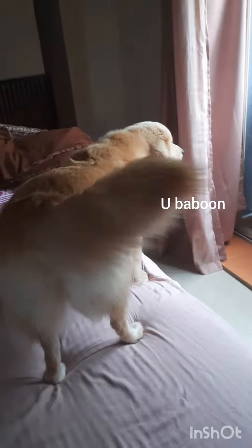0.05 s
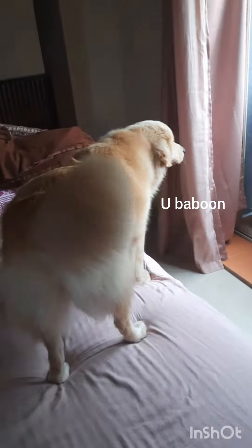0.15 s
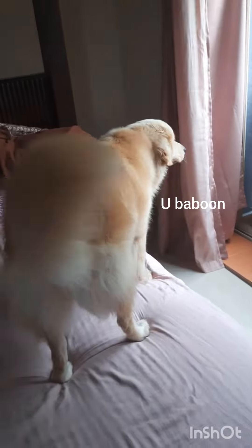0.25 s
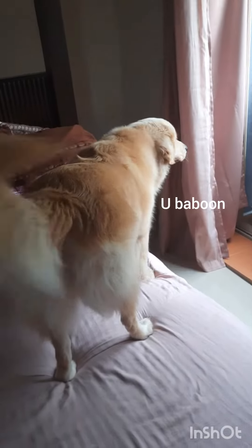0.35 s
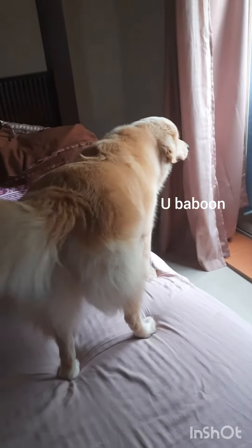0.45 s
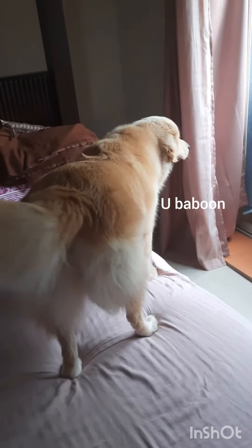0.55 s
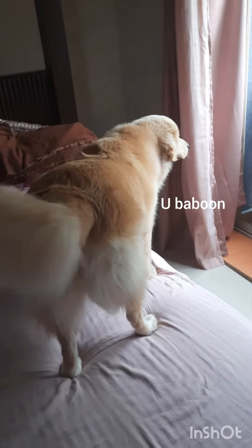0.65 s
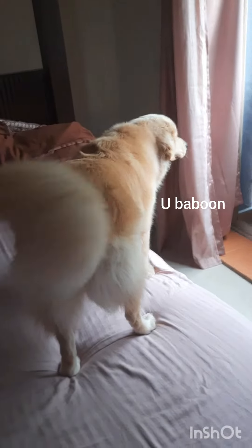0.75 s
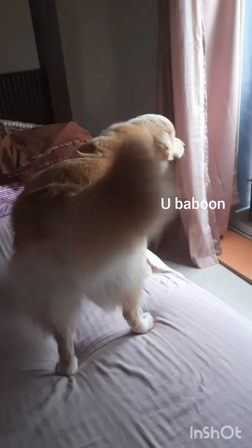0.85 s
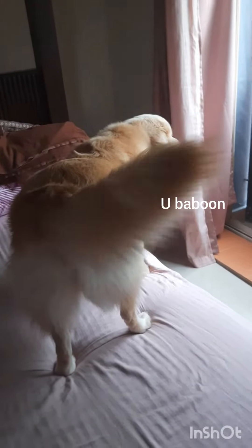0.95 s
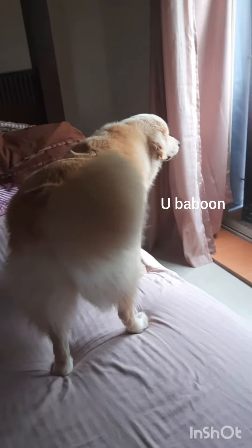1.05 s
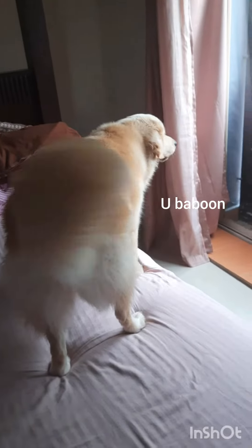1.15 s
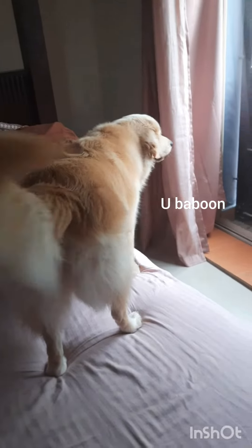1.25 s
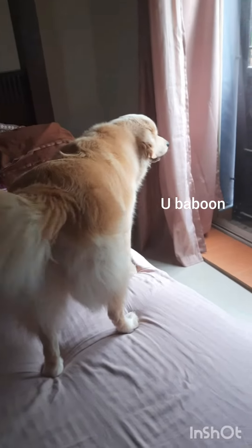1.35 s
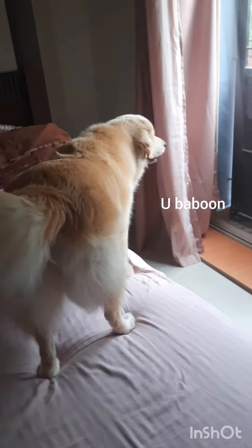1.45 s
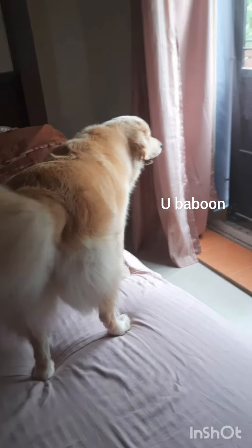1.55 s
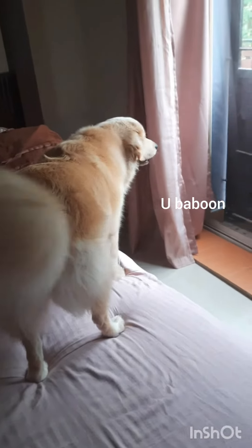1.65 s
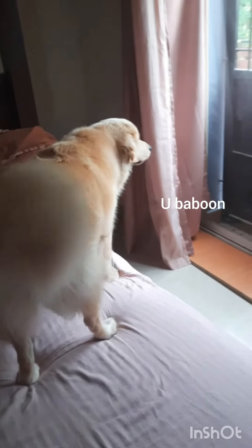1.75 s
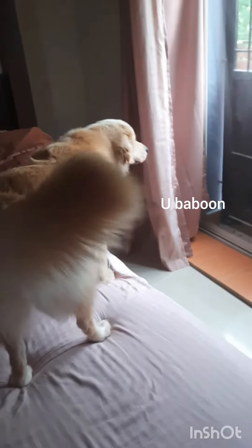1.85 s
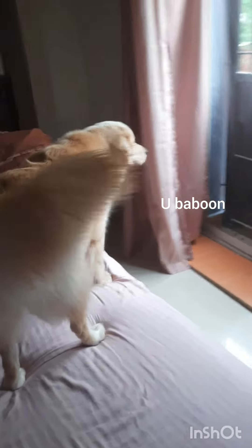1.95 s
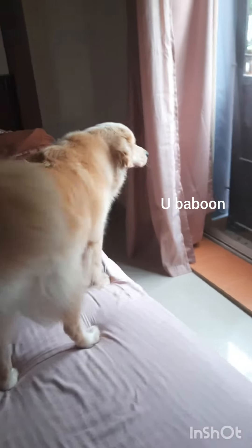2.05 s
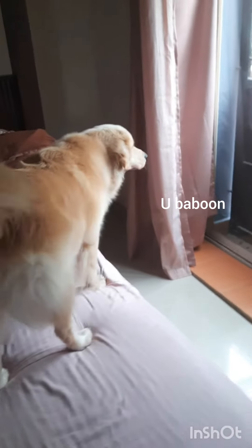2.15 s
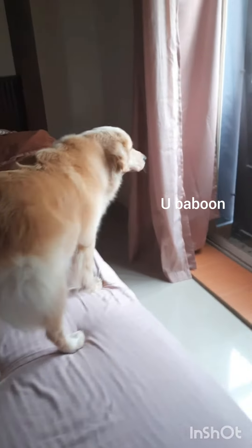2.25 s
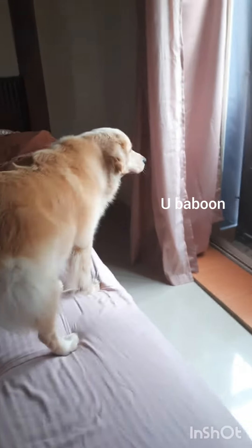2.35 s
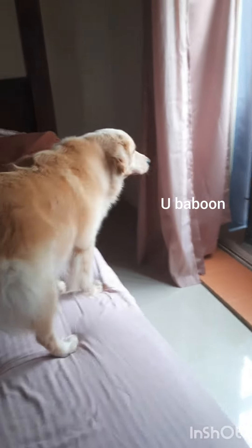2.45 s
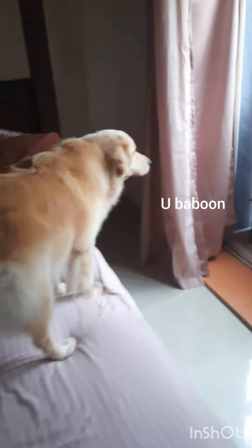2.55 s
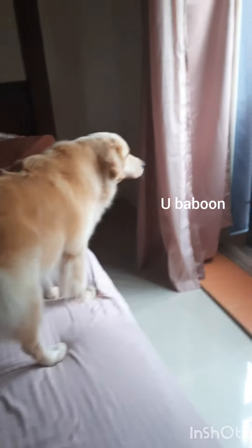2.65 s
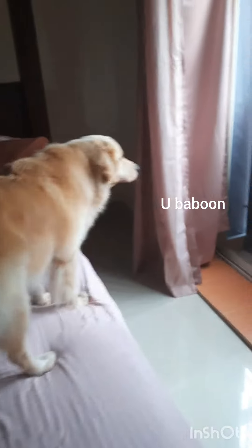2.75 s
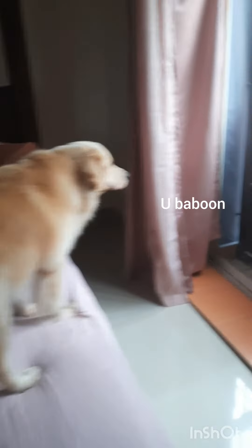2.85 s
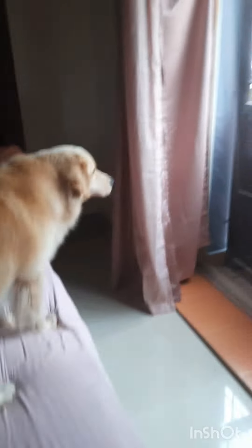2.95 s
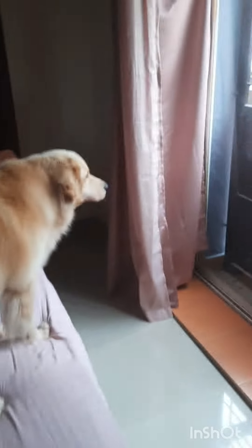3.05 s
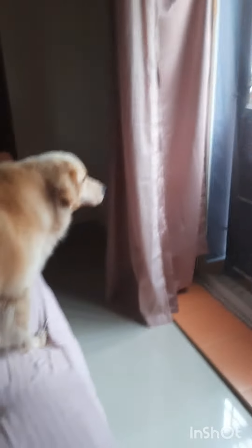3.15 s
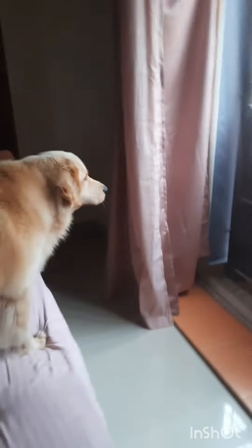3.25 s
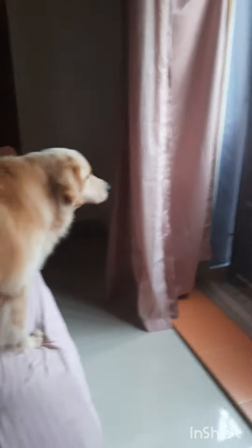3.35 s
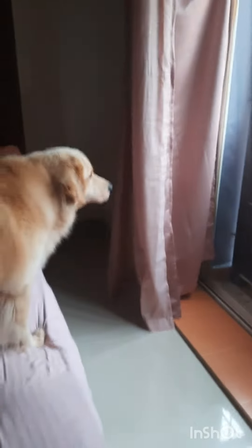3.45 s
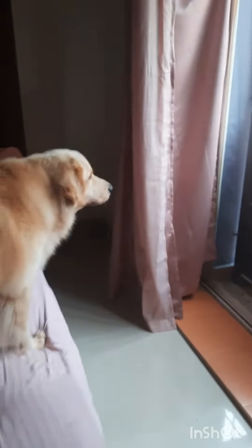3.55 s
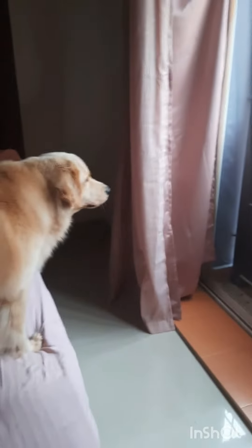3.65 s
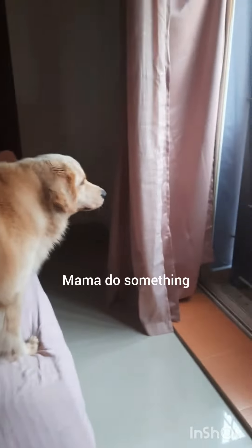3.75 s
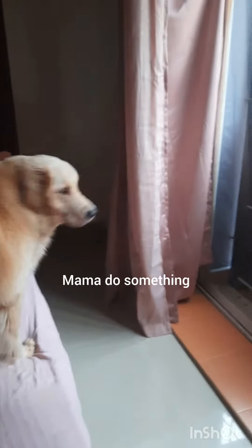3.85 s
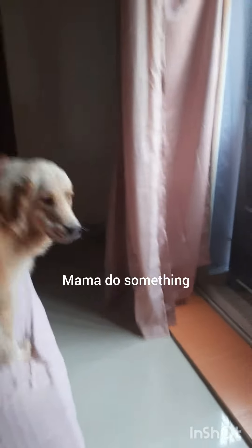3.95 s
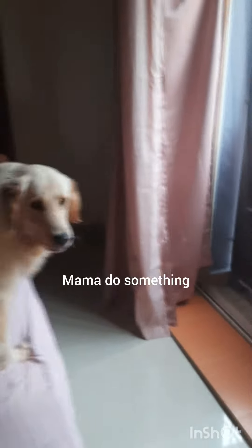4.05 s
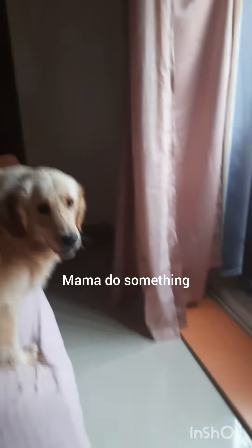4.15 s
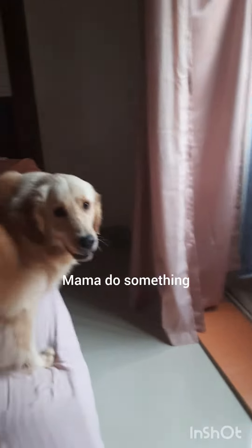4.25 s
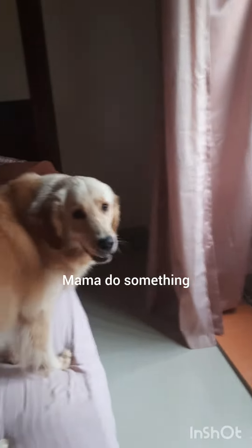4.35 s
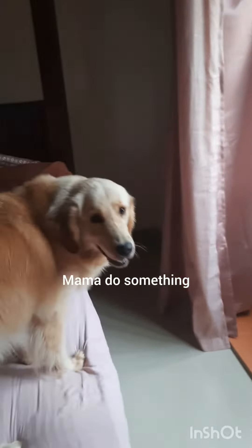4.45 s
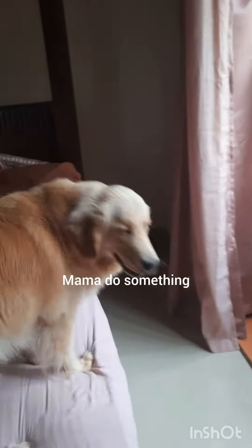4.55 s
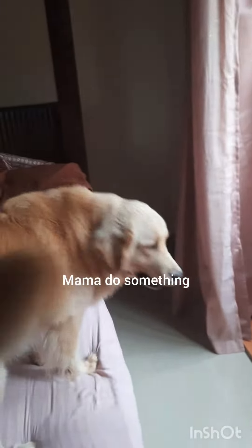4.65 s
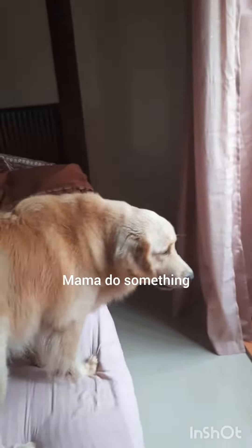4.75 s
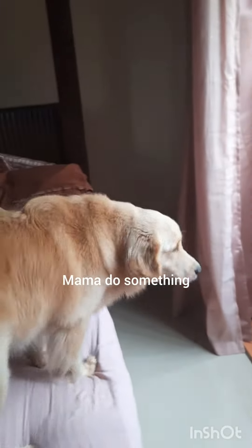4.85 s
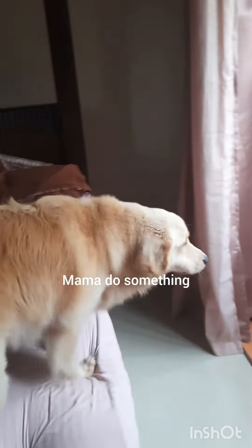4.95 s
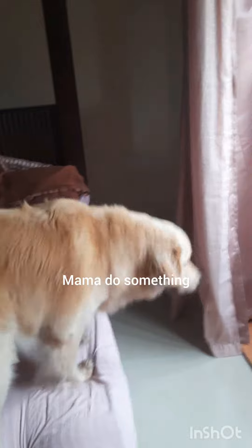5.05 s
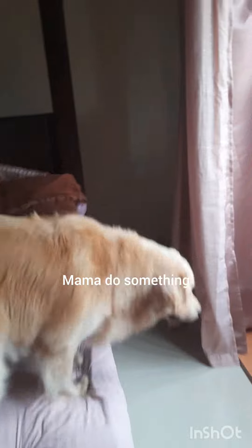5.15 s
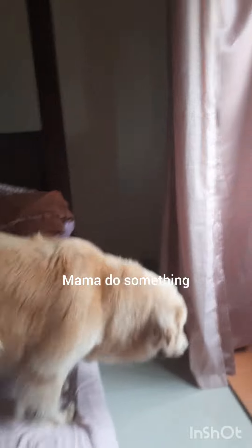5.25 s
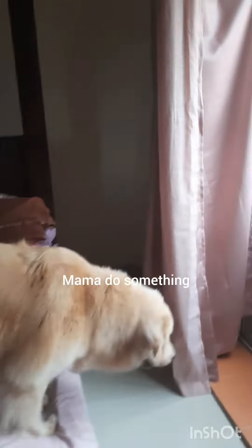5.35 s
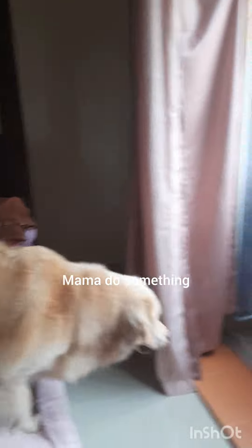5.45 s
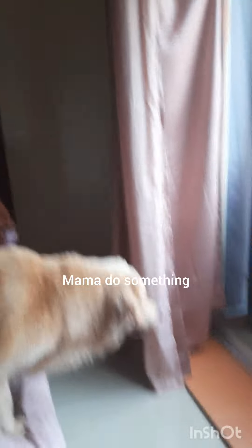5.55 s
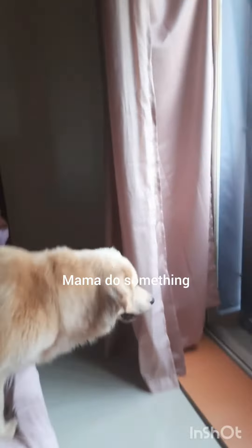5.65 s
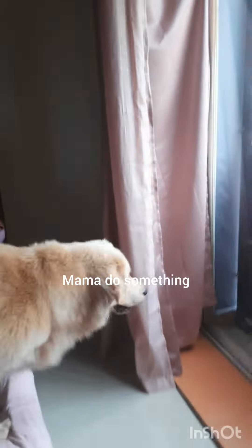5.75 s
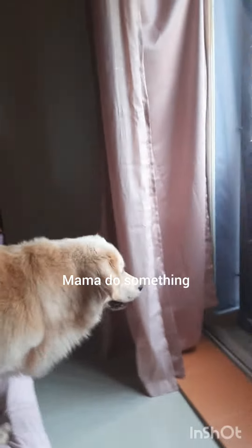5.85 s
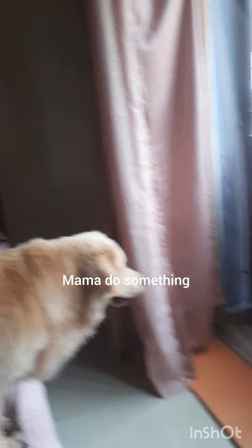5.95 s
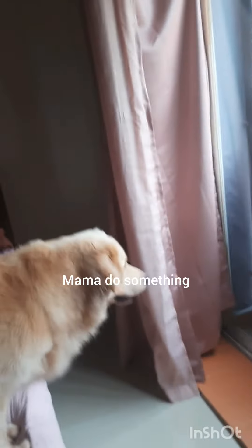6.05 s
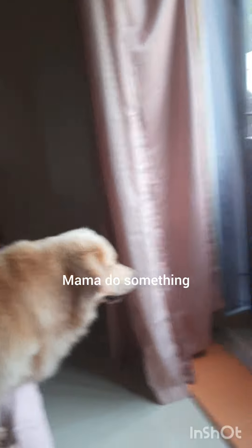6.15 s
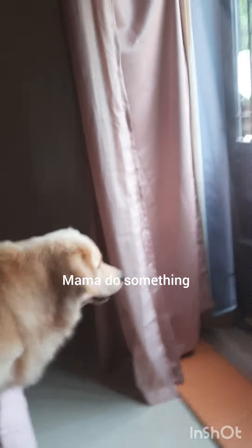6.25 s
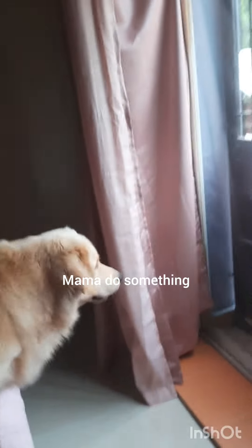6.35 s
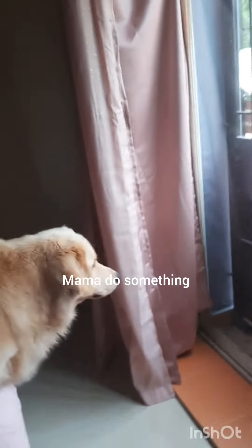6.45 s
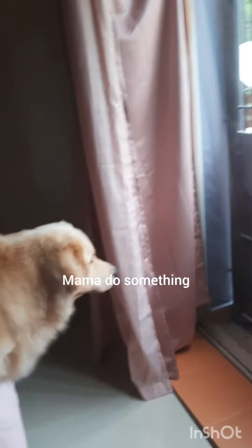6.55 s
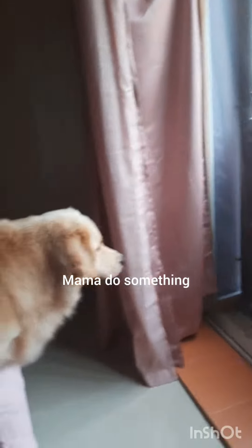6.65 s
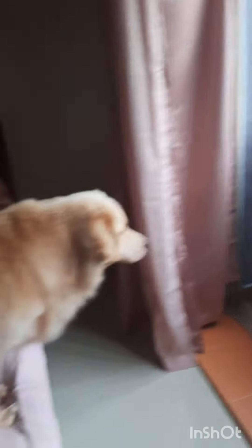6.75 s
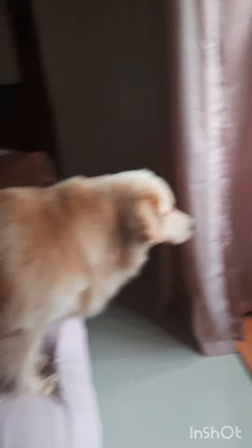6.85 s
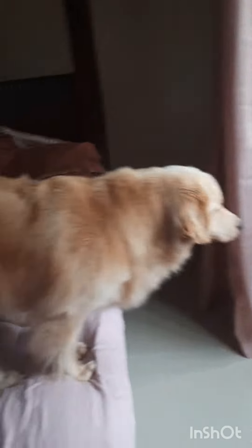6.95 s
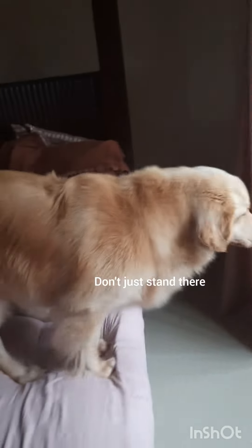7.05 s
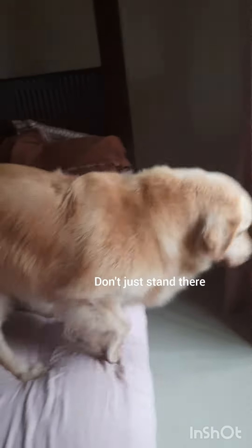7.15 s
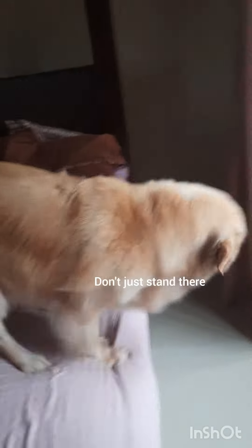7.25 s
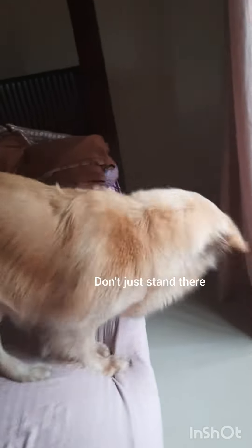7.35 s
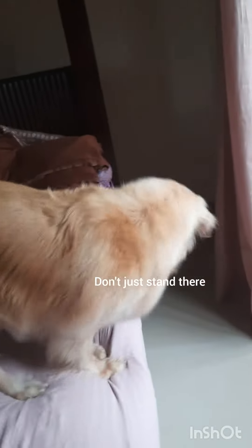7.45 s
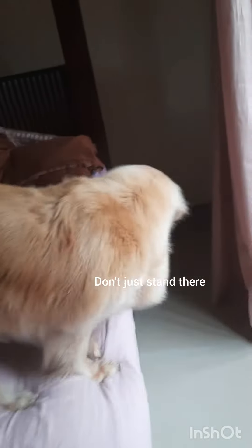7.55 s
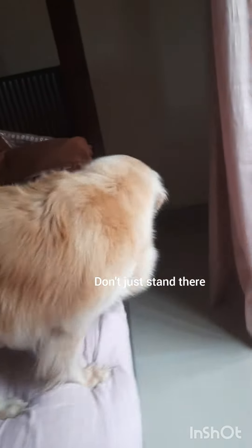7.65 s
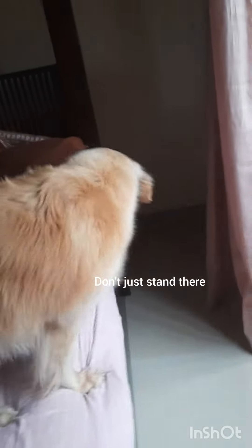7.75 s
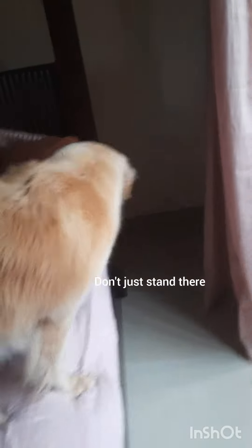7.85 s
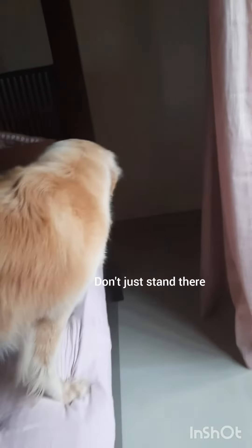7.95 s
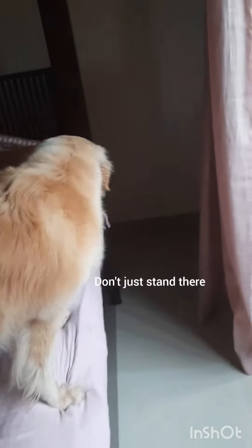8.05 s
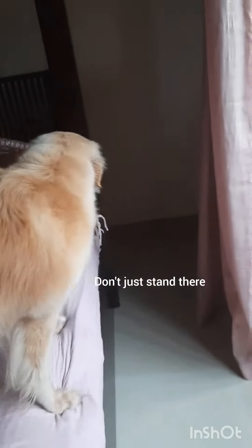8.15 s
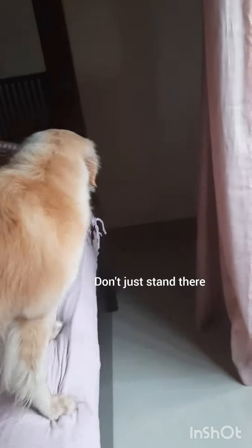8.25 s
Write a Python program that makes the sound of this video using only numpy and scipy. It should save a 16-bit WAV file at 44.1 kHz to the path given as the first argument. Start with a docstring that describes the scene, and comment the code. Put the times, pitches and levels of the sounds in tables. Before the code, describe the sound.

Throaty dog growls over soft room rumble, broken by a sudden loud bark, a muffled woof and a final growled bark, echoing briefly.

```python
"""A large dog on a bed in a tiled bedroom growls low with a fluttering throat, over a low hum, rumble and faint
hiss. It pants and sniffs, whines faintly, smacks its lips and paws the mattress; it barks twice and woofs once.
The voice is fold pulses, sine partials and noise through resonances; breath, rumble, murmur and hiss are shaped
noise, with a steady low sine hum beside the rumble. The walls answer the dog for about half a second."""
import sys
import numpy as np
from scipy import signal
from scipy.fft import rfft, irfft, next_fast_len
from scipy.io import wavfile
from scipy.ndimage import uniform_filter1d, minimum_filter1d, map_coordinates

SR = 44100
rng = np.random.default_rng(int(sys.argv[2]) if len(sys.argv) > 2 else 0)


def to_wav(sig):
    """Store sig (one row per channel, or 1-D mono) as 16-bit WAV at the path in sys.argv[1].

    Samples outside -1..1 are clipped; the rate is SR.
    """
    pcm = np.clip(np.atleast_2d(sig), -1, 1) * 32767
    pcm = np.round(pcm).astype(np.int16)
    wavfile.write(sys.argv[1], SR, pcm.T)  # frames by channels


def gain_from_db(level_db):
    """Turn a decibel level (scalar or array-like) into a linear amplitude factor."""
    decades = np.asarray(level_db, float) / 20
    return 10 ** decades


N = 365588  # samples

# All resonances: centre f/Hz, width of one of two passes/Hz, relative level/dB

# Growls, one list each: t/s, pitch f/Hz, effort/dB, larynx height/0-1, lip opening/dB
GROWLS = [
    [(0, 103.4, -34, 0, 5.5), (.07, 104.9, -40.5, 0.4, -4), (.3, 106.4, -46, .62, 4),
     (.42, 107.6, -46, .25, 1.5), (.52, 106, -47.5, 1, 4), (.6, 104.7, -39, 0.18, -4.5),
     (.7, 103.9, -41, 0.55, -0.5), (.8, 108.2, -45, 0.57, -3), (.98, 101.9, -36, 0.28, -3.5),
     (1.015, 98.7, -37, 0, -3), (1.05, 106, -62, 0, 1)],
    [(1.68, 94.5, -55, 0.34, 4), (1.73, 95.7, -54.5, 0, 14), (1.79, 102.3, -42, 0.04, 10.5),
     (1.86, 107.7, -36, .6, 6), (1.93, 109.6, -43, .65, 8.5), (2.02, 111.4, -41, 0, -1),
     (2.15, 111.4, -46, 0.21, 5), (2.5, 108.3, -47, 0.34, 4.5), (2.85, 105.6, -48, 0.42, 3.5),
     (3, 103.2, -43, 0.12, -1.5), (3.12, 103.7, -37, 0.23, -0.5), (3.23, 102.3, -37, 0.48, -6.5),
     (3.3, 95, -42, 0.1, -13), (3.4, 87.7, -56, 0.24, -22)],
    [(6.5, 92.8, -65.5, 0.08, 0), (6.62, 91.4, -60.5, 0.27, -7.5), (6.7, 94.1, -48, 0, -5.5),
     (6.76, 96.6, -39, 0.06, -2.5), (6.85, 104.3, -37.5, 0.28, 0), (6.95, 108.5, -37, 0.58, 4.5),
     (7.03, 112.2, -26, 0.44, -1.5), (7.08, 111.6, -30.5, .9, 8), (7.115, 119.5, -30, 0.88, 10),
     (7.15, 130, -22, .95, 4.5)],
]
# Growls: throat flap rate/Hz, depth at usual effort/0-1
FLUTTERS = [(21.5, .5), (22.8, .8), (26, .55)]
# Growls at usual effort: fundamental level/dB, upper partials level/dB, high ring level/dB
MANNERS = [(-48, -61.5, -83.5), (-50.5, -59, -79.5), (-57.5, -57.5, -86.5)]
# Growls, closed-mouth resonances: f/Hz, width/Hz, level/dB
NOSE = [(419.7, 850, -6), (612, 85, 11.5), (660, 65, 9), (933, 380, -14.5)]
# Growls, high ring, one list each: f/Hz, width/Hz, level/dB
PALATES = [
    [(1320, 150, -5.5), (2580, 780, -17)],
    [(1423.5, 220, -9.5), (2510, 330, -10)],
    [(1550, 360, -13.5), (2820, 240, 0)],
]
# Air hiss, nostrils and room: f/Hz, relative density level/dB
AIR = [(2060, -35), (3500, -9.5), (5910, -3), (6370, 0), (7540, -0.5), (8180, 2.5), (9380, -13.5),
       (11000, -5), (15600, -6.5)]

# Steady low hum with a rumble of room and growling chest, and room murmur swelling with the lingering echoes
# after barks: t/s, hum and rumble relative level/dB, murmur relative level/dB
FLOOR = [(0, -55, -90), (1, -61, -78.5), (1.251, -70.5, -79), (1.9, -67, -74), (2.3, -59.5, -80),
         (3.2, -59, -76.5), (3.5, -68, -75.5), (4.8, -73.5, -78), (5.099, -57.5, -66), (5.6, -67.5, -69),
         (6.05, -70, -83.5), (6.6, -67.5, -82), (7.2, -48.5, -68.5), (7.7, -71, -69.5), (8.29, -77, -88.5)]
# Spectrum of the room and chest rumble: f/Hz, relative density level/dB
RUMBLE = [(25, -31), (40, -12), (60, -4), (85, -11.5), (125, -6.5), (165, -16), (250, -23), (400, -27),
          (600, -55), (900, -120)]
# Room murmur spectrum: f/Hz, relative density level/dB
MURMUR = [(120, -35), (200, -3), (302, -2.5), (352, -22.5), (379, -4.5), (642, -10.5), (856, -17),
          (1010, -15), (1520, -11.5), (4000, -30.5), (5200, -67.5), (8800, -120)]

# Breaths: peak t/s, rise/s, fall/s (each over 20 dB of flow), pant level/dB, hiss level/dB
BREATHS = [(1.67, 0.034, .26, -60.5, -94.5), (3.222, 0.054, .04, -55, -57.5), (3.58, .1, .11, -78.5, -81.5),
           (3.94, 0.062, 0.12, -29, -42.5), (4.47, 0.076, .085, -52, -80), (4.68, 0.079, 0.17, -67, -105),
           (5.035, 0.11, 0.083, -34.5, -53), (5.43, 0.054, 0.15, -57.5, -62.5),
           (5.51, 0.11, 0.092, -39, -64), (5.94, 0.13, .14, -75.5, -85), (6.257, .03, 0.034, -84, -72.5),
           (6.35, .02, 0.16, -61.5, -92), (7.225, 0.053, 0.15, -26.5, -39.5),
           (8.115, .015, 0.33, -79.5, -72.5)]
# Open-mouth resonances of the pant: f/Hz, width/Hz, level/dB
PANT = [(413, 110, -2), (700, 150, 1), (1066, 240, -5.5), (1557, 270, -6.5), (1956, 480, -13.5),
        (2510, 440, -13), (3440, 1200, -26.5)]
# Air past teeth and nostrils: f/Hz, relative density level/dB
HISS = [(1470, -28), (2500, -8.5), (2640, -10.5), (3720, -9.5), (5580, -13), (7520, -13), (9460, -26.5),
        (12600, -22), (15600, -27.5)]
# Small cavities at the front of the mouth: f/Hz, width/Hz, level/dB
TEETH = [(2620, 530, -1), (3340, 350, 2), (4730, 1100, -6.5)]

# Whines: start t/s, length/s, fundamental f/Hz, 2nd partial level/dB, 3rd partial level/dB
WHINES = [(3.12, 0.44, 509.4, -71.5, -71.5), (6.357, 0.097, 308.6, -61.5, -67),
          (7.66, 0.088, 354.5, -51.5, -65)]
# Lips and tongue: t/s, tone onset level/dB, f/Hz
SMACKS = [(3.2239, -36, 2890), (3.3732, -55, 1296), (6.2639, -60, 2130), (6.8665, -52.5, 878),
          (7.9445, -62.5, 2720), (8.1102, -71.5, 4220), (8.1295, -57.5, 2510)]
# Paws on the mattress: t/s, peak level/dB
THUDS = [(3.579, -50), (3.617, -60.5), (6.27, -75), (6.309, -69.5), (7.935, -47.5), (7.964, -56.5),
         (7.989, -55), (8.03, -59), (8.119, -61)]
# Mattress resonances: f/Hz, width/Hz, level/dB
MATTRESS = [(130, 52, 3), (279.5, 60, 2.5), (500, 72, -20)]

# Barks, one list each: t/s, pitch f/Hz, level/dB, mouth opening/dB
BARKS = [
    [(3.72, 195.1, -77, -43.5), (3.79, 178.7, -46, -37.5), (3.83, 180.5, -52, -34.5),
     (3.858, 181.5, -36.5, -35.5), (3.886, 186.1, -9.5, -20), (3.903, 198.7, -13.5, -8),
     (3.924, 181.2, -11.5, -12), (3.94, 177, -16.5, -9), (3.955, 172, -39, -5)],
    [(4.82, 127.6, -59, -24), (4.85, 127.7, -37.5, -28), (4.89, 130, -35, -23.5),
     (4.92, 132.1, -33.5, -18.5), (4.955, 129.8, -32, -14.5), (4.985, 127.2, -39, -10.5),
     (5.04, 123.6, -55, -2)],
    [(7.14, 138.7, -39, -32), (7.156, 152.6, -23.5, -34), (7.172, 182.2, -13, -31.5),
     (7.19, 189.5, -18, -20.5), (7.208, 204.1, -8, -16), (7.216, 198.1, -13.5, -17),
     (7.24, 194.1, -21.5, -6), (7.27, 190, -27, -7)],
]
# Barks: chest level half open/dB, chest slope/(dB per dB of opening)
CHESTS = [(-12.5, -1.06), (3, 0.63), (-16, 0.42)]
# Barks: roughness half open/0-1, roughness slope/(1 per dB of opening)
RASPS = [(.4, -.008), (.65, .003), (.27, .016)]
# Throat resonances, one list per bark: f/Hz, width/Hz, level/dB
THROATS = [
    [(344.6, 110, 1), (825, 110, 0.5)],
    [(327.3, 69, 3.5), (749, 74, -0.5)],
    [(351.4, 110, 4.5), (756, 170, 0)],
]
# Mouth resonances, one list per bark: f/Hz, width/Hz, level/dB
MOUTHS = [
    [(1038, 170, 2), (1370, 330, -1.5), (2583, 200, 3.5), (8350, 470, -31.5)],
    [(956.5, 290, -6.5), (1416, 210, -7), (2350, 79, -8.5), (2740, 200, -13), (6730, 2700, -33)],
    [(922, 310, -2.5), (1675, 190, -10), (2684, 177, -3), (3394, 700, -18.5), (6060, 980, -32),
     (8800, 690, -28.5)],
]
# Chest resonance of the barks: f/Hz, width/Hz, level/dB
CHEST = [(242, 170, 1)]

# Diffuse sound: f/Hz, left-right correlation/-1..1
ALIKE = [(60, 0.7), (300, 0.84), (700, 0), (1400, 0), (15000, 0.031)]
# Direct sound: f/Hz, left minus right level/dB, left phase lead/rad
SIDES = [(100, 1.5, 0.1), (384, 1, 0.23), (680, 2, 1.3), (1300, -8, 1.4), (2480, -7, 1.4), (5000, -8, 1.1),
         (9105, 11.5, 0.69), (15000, 2, 2.1)]
# Wall decay: f/Hz, t60/s
ROOM = [(100, 0.93), (350, 0.58), (700, 0.6), (2000, 0.51), (5000, 0.59), (12000, 0.38)]


def unit(x):
    """Scaled to rms 1."""
    return x / np.sqrt(np.mean(x ** 2) + 1e-20)


def along(points, hz, column=1):
    """A table column read at hz on a log frequency axis."""
    rows = np.array(points)
    return np.interp(np.log(hz + 1), np.log(rows[:, 0] + 1), rows[:, column])


def curves(rows):
    """First sample, then one per-sample curve for each column after the time."""
    time_s, *columns = np.transpose(rows)
    first = round(time_s[0] * SR)
    t = np.arange(first, round(time_s[-1] * SR)) / SR
    return first, [np.interp(t, time_s, column) for column in columns]


def wobble(n, rate_hz):
    """Smooth random curve, rate_hz knots a second."""
    knots = rng.standard_normal(int(n * rate_hz / SR) + 4)
    return map_coordinates(knots, [np.arange(n) * rate_hz / SR])


def filtered(x, response):
    """x shaped by a complex response of frequency."""
    size = next_fast_len(x.shape[-1] + 8192)
    spectrum = rfft(x, size) * response(np.fft.rfftfreq(size, 1 / SR))
    return irfft(spectrum, size)[..., :x.shape[-1]]


def coloured(x, spectrum):
    """x shaped by a table of density levels; rms 1."""
    return unit(filtered(x, lambda f: gain_from_db(along(spectrum, f))))


def tract(x, modes):
    """Two passes through parallel resonances of alternating sign: deep valleys between them; rms 1."""
    def response(f):
        total = 0
        for k, (centre_hz, width_hz, db) in enumerate(modes):
            damping = 1j * f * width_hz
            total = total + (-1) ** k * gain_from_db(db / 2) * damping / (centre_hz ** 2 - f ** 2 + damping)
        return total ** 2
    return unit(filtered(x, response))


def diffuse(pair, spectrum):
    """Two unrelated signals, coloured and made as alike as the microphone spacing makes them."""
    def response(hz):
        turn = np.arccos(np.clip(along(ALIKE, hz), -1, 1)) / 2
        return gain_from_db(along(spectrum, hz)) * np.array([np.cos(turn), np.sin(turn)])
    mid, side = filtered(pair, response)
    return np.array([mid + side, mid - side])


def add(out, first, x, wet_db):
    """Direct sound to both microphones, then wall noise decaying at a rate set by frequency."""
    hz, t, z = signal.stft(rng.standard_normal((2, SR * 3 // 4)), SR, nperseg=256)
    decay = gain_from_db(-60 * t / along(ROOM, hz)[:, None])
    tail = signal.istft(z * decay, SR, nperseg=256)[1]
    tail = np.pad(tail, ((0, 0), (round(.006 * SR), 0)))  # walls start 6 ms late
    tail = diffuse(tail, [(100, 0)])
    index = np.arange(len(x))
    faded = x * np.minimum(1, np.minimum(index, index[::-1]) / (.012 * SR))  # 12 ms ends
    both = gain_from_db(wet_db) * signal.fftconvolve(faded[None], tail / np.linalg.norm(tail[0]), axes=1)

    def sides(f):
        half = gain_from_db(along(SIDES, f) / 2) * np.exp(.5j * along(SIDES, f, column=2))
        return np.array([half, 1 / half])
    both[:, :len(x)] += filtered(faded, sides)
    out[:, first:first + both.shape[1]] += both[:, :N - first]


def glottis(hz, rough, jitter):
    """One pulse per vocal-fold cycle, uneven in time and size, with noise gated once a cycle."""
    n, rough = len(hz), np.clip(rough, 0, 1)
    cycle = np.cumsum(hz * (1 + jitter * rough * wobble(n, 150))) / SR
    pulses = np.diff(np.floor(cycle), prepend=0) * gain_from_db(5 * rough * wobble(n, 120))
    noise = rng.standard_normal(n) * np.exp(-3.5 * (cycle % 1))
    return np.sqrt(1 - rough) * unit(pulses) + np.sqrt(rough) * unit(noise)


def low_partials(hz, levels_db, flap, depth):
    """Three sine partials chopped by the flapping throat, the upper two much harder."""
    n = len(hz)
    phase = 2 * np.pi * np.cumsum(hz * (1 + .007 * wobble(n, 40))) / SR
    total = np.zeros(n)
    for k, (db, share) in enumerate(zip(levels_db, [.15, .95, .75])):
        chop = 1 + share * depth * np.cos(flap)
        chop = chop / np.sqrt(1 + (share * depth) ** 2 / 2)  # chopping keeps the rms
        total += gain_from_db(db + 1.2 * wobble(n, 30)) * np.sqrt(2) * chop * np.sin((k + 1) * phase + k)
    return total


def growls(out):
    """Clear low partials and rougher upper ones, chopped by slack throat tissue; effort drives all layers."""
    usual_effort_db, parted_lips_db = -43, 5
    larynx_down_hz, larynx_up_hz, larynx_width_hz = 200, 340, 70  # throat resonance
    boom_from_hz, boom_db_per_hz, boom_top_db = 111.5, 4, 14.5
    for rows, flutter, manner, palate in zip(GROWLS, FLUTTERS, MANNERS, PALATES):
        first, (hz, effort_db, larynx, lips_db) = curves(rows)
        flap_hz, usual_depth = flutter
        fundamental_db, upper_db, ring_db = manner
        n, push_db = len(hz), effort_db - usual_effort_db

        # effort tightens the throat
        depth = np.clip(usual_depth - .035 * push_db, 0, 1)
        flap = 2 * np.pi * np.cumsum(flap_hz * (1 + .1 * wobble(n, 8))) / SR + rng.uniform(0, 7)

        # the larynx shares the effort between partials 2 and 3
        throat_hz = larynx_down_hz + (larynx_up_hz - larynx_down_hz) * np.clip(larynx, 0, 1)
        lift = np.array([1 / np.hypot(throat_hz ** 2 - (k * hz) ** 2, k * hz * larynx_width_hz)
                         for k in (2, 3)])
        second_db, third_db = effort_db + 20 * np.log10(lift / np.hypot(*lift))
        # the fundamental swells as it climbs toward the chest resonance
        boom_db = np.clip(boom_db_per_hz * (hz - boom_from_hz), 0, boom_top_db)
        fundamental_db = fundamental_db + .5 * push_db + boom_db
        low = low_partials(hz, [fundamental_db, second_db, third_db], flap, depth)
        rasp = tract(rng.standard_normal(n), [(240, 200, 0), (370, 160, -2)])
        rasp = gain_from_db(second_db - 8) * depth * rasp

        # parted lips turn the growl into a rough snarl
        snarl_db = np.maximum(lips_db - parted_lips_db, 0)
        upper_db = upper_db + .75 * push_db + lips_db
        # air leaking past the folds
        leak = tract(rng.standard_normal(n), [(390, 160, .5), (796, 120, -9.5)])
        hoarse = gain_from_db(upper_db - 9 + 2.1 * snarl_db) * leak
        source = glottis(hz, .4 * depth + .06 * snarl_db, jitter=.015)
        upper = (1 + .35 * depth * np.cos(flap + 2.2)) * gain_from_db(upper_db) * tract(source, NOSE)
        # the muzzle holds the treble back
        muffled = filtered(hoarse + upper, lambda f: 1 / (1 + (f / 1000) ** 8))

        breathy = glottis(hz, np.full(n, .85), jitter=.015)
        ring = gain_from_db(ring_db + .9 * push_db + .6 * lips_db) * tract(breathy, palate)
        nostrils = gain_from_db(-85 + .3 * push_db) * coloured(rng.standard_normal(n), AIR)
        add(out, first, low + rasp + muffled + ring + nostrils, wet_db=-16)


def rumble_murmur_hiss():
    """Steady low hum with a low rumble of room and growling chest, room murmur swelling with bark echoes, hiss
    partly following it."""
    time_s, *levels = np.transpose(FLOOR)
    rumble_db, murmur_db = [np.interp(np.arange(N) / SR, time_s, db) for db in levels]
    rumble, murmur, hiss = [unit(diffuse(rng.standard_normal((2, N)), spectrum))
                            for spectrum in (RUMBLE, MURMUR, AIR)]
    hum = np.sin(2 * np.pi * np.cumsum(51.5 + .8 * wobble(N, 3.6)) / SR) * gain_from_db(1.7 * wobble(N, 12))
    murmur *= gain_from_db(1.5 * wobble(N, 7))
    hiss *= gain_from_db(1.3 * wobble(N, 5))
    hiss_db = -85 + .33 * (murmur_db - murmur_db.mean())
    low = gain_from_db(rumble_db) * (.87 * hum + 1.3 * rumble)
    return low + gain_from_db(murmur_db + 5.5) * murmur + gain_from_db(hiss_db) * hiss


def breaths(out):
    """Turbulent air rings the open mouth and hisses past teeth and nostrils."""
    t = np.arange(-SR // 4, SR // 2) / SR
    for peak_s, rise_s, fall_s, pant_db, hiss_db in BREATHS:
        # exponent: 1 pointed, 2 round
        flow_db = -20 * np.abs(t / np.where(t < 0, rise_s, fall_s)) ** 1.425
        air = rng.standard_normal((2, len(t))) * gain_from_db(1.5 * wobble(len(t), 60))
        band = filtered(air[0], lambda f: 1 / (1 + (f / 4800) ** 6) / (1 + (300 / (f + 1)) ** 4))
        pant = gain_from_db(flow_db + pant_db) * tract(band, PANT)
        hiss = coloured(air[1], HISS) + gain_from_db(-7.5) * tract(air[1], TEETH)
        hiss = gain_from_db(1.4 * flow_db + hiss_db) * hiss  # steeper than the pant
        add(out, round((peak_s + t[0]) * SR), pant + hiss, wet_db=-4.5)


def whines(out):
    """Faint voiced tones of the 2nd and 3rd partials, wavering in pitch and level."""
    for start_s, length_s, hz, second_db, third_db in WHINES:
        i = np.arange(round(length_s * SR))
        n = len(i)
        phase = 2 * np.pi * np.cumsum(hz * (1 + .03 * wobble(n, 90))) / SR
        swell = np.sin(np.pi * i / n) ** .4 * gain_from_db(3.2 * wobble(n, 40))
        tone = gain_from_db(second_db) * np.sin(2 * phase) + gain_from_db(third_db) * np.sin(3 * phase)
        add(out, round(start_s * SR), swell * tone, wet_db=-16)


def smacks(out):
    """Wet lip and tongue clicks: a noisy tone losing 60 dB in 12 ms."""
    track, t = np.zeros(N + SR), np.arange(SR // 8) / SR
    for start_s, db, hz in SMACKS:
        click = np.sin(2 * np.pi * hz * t) + .3 * rng.standard_normal(len(t))
        track[round(start_s * SR):][:len(t)] += gain_from_db(db - 60 * t / .012) * click
    add(out, 0, track[:N], wet_db=-14.5)


def thuds(out):
    """Soft paw steps: a noise push losing 60 dB in 45 ms rings the mattress."""
    track, t = np.zeros(N + SR), np.arange(SR // 8) / SR
    for start_s, db in THUDS:
        thud = tract(gain_from_db(-60 * t / .045) * rng.standard_normal(len(t)), MATTRESS)
        track[round(start_s * SR):][:len(t)] += gain_from_db(db) * thud / np.abs(thud).max()
    add(out, 0, track[:N], wet_db=-14.5)


def barks(out):
    """Rough pulses through chest and throat; the upper resonances come out as the mouth opens."""
    half_open_db = -20
    for rows, chest, rasp, throat, mouth in zip(BARKS, CHESTS, RASPS, THROATS, MOUTHS):
        first, (hz, db, open_db) = curves(rows)
        (chest_db, chest_slope), (rough, rough_slope) = chest, rasp
        wider_db = open_db - half_open_db
        source = glottis(hz, rough + rough_slope * wider_db, jitter=.12)
        # little deep bass radiates; shut lips hold the treble back
        dull = filtered(source, lambda f: (1j * f / (110 + 1j * f)) ** 3 / (1 + 1j * f / 900) ** 4)
        voice = tract(dull, throat)
        voice = voice + gain_from_db(chest_db + chest_slope * wider_db) * tract(dull, CHEST)
        voice = voice + gain_from_db(open_db) * tract(source, mouth)
        add(out, first, gain_from_db(db) * voice, wet_db=-5.5)


def scene():
    """Dog and room."""
    out = rumble_murmur_hiss()
    for source in (growls, breaths, whines, smacks, thuds, barks):
        source(out)
    return out


def low_pass(x):
    """Removes everything above the highest recorded frequency."""
    return signal.sosfilt(signal.butter(12, 15700, fs=SR, output="sos"), x)


def record(dry):
    """A look-ahead limiter turns the loudest peaks down, both channels alike."""
    needed = np.minimum(1, .9 / (np.abs(dry).max(axis=0) + 1e-9))
    gain = uniform_filter1d(minimum_filter1d(needed, size=601), size=301)  # samples
    return low_pass(dry * gain)


dry = scene()
out = record(dry)
to_wav(out)
```